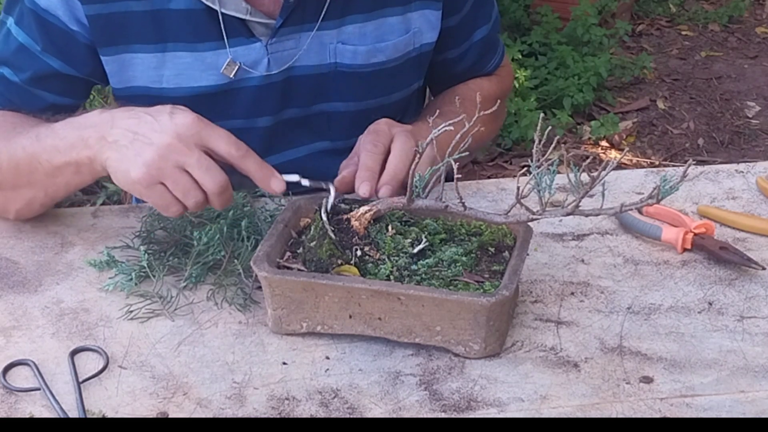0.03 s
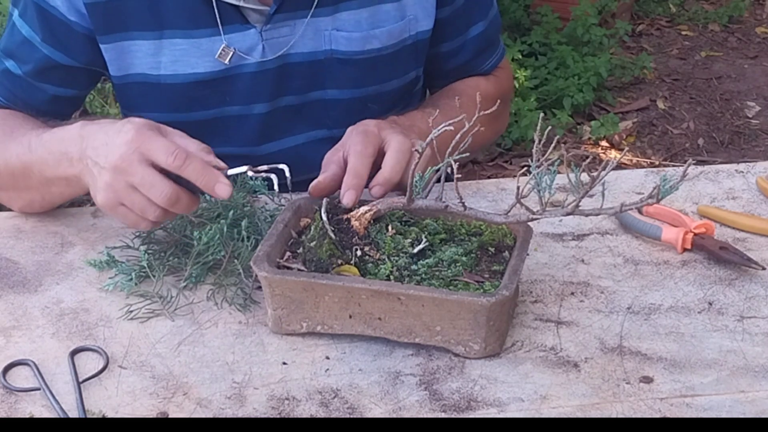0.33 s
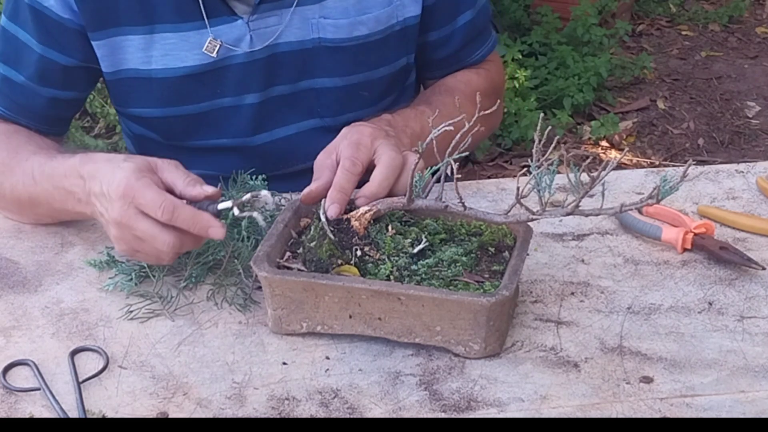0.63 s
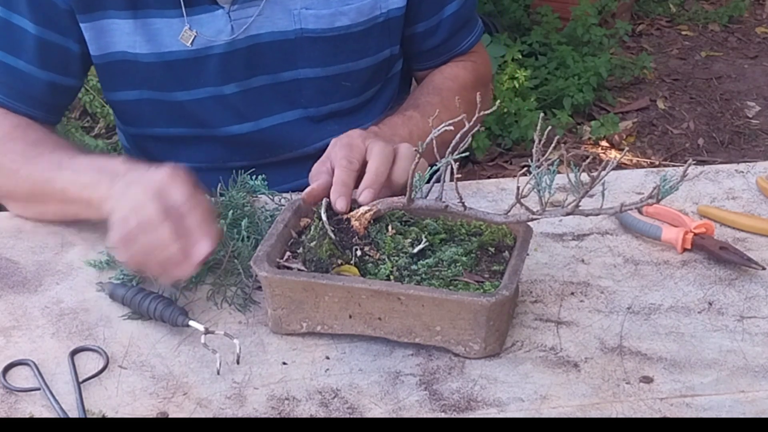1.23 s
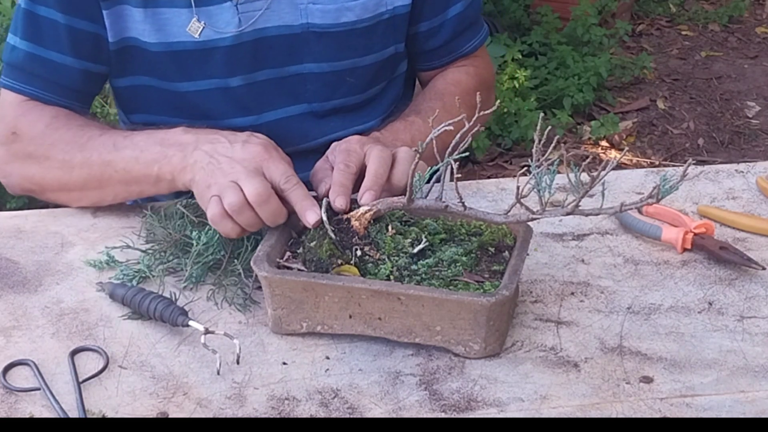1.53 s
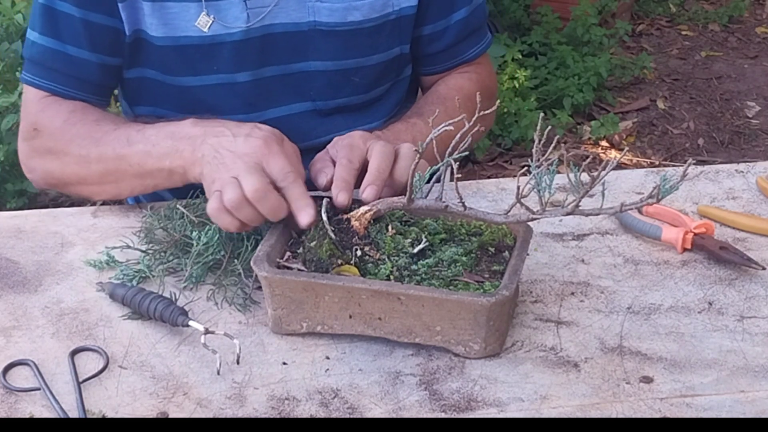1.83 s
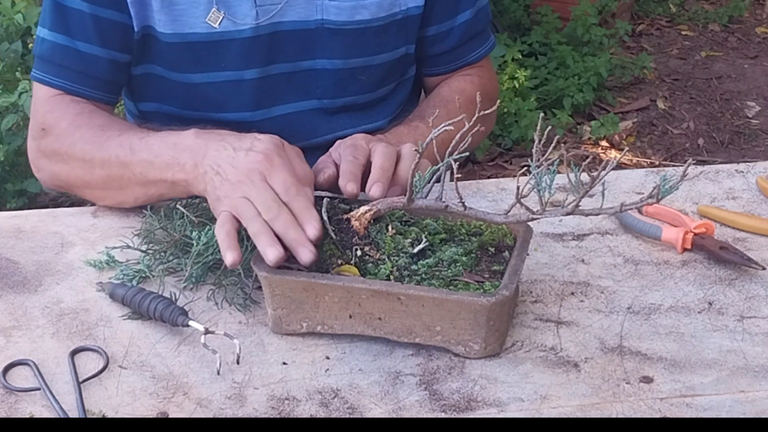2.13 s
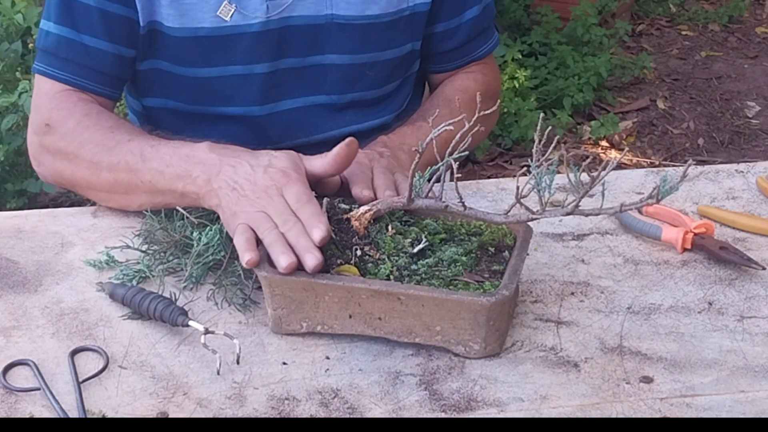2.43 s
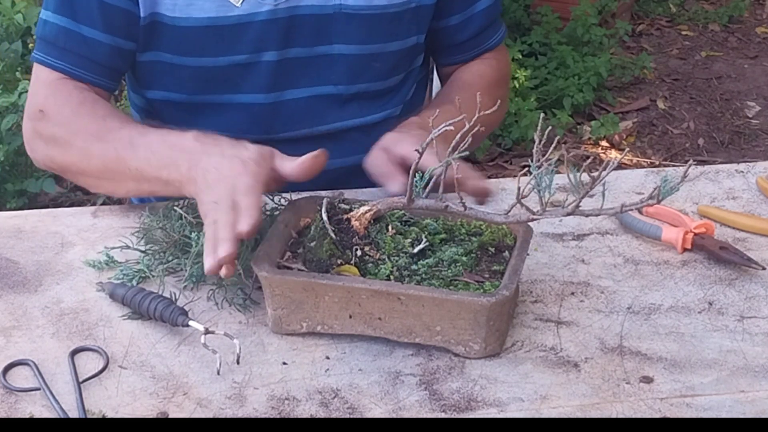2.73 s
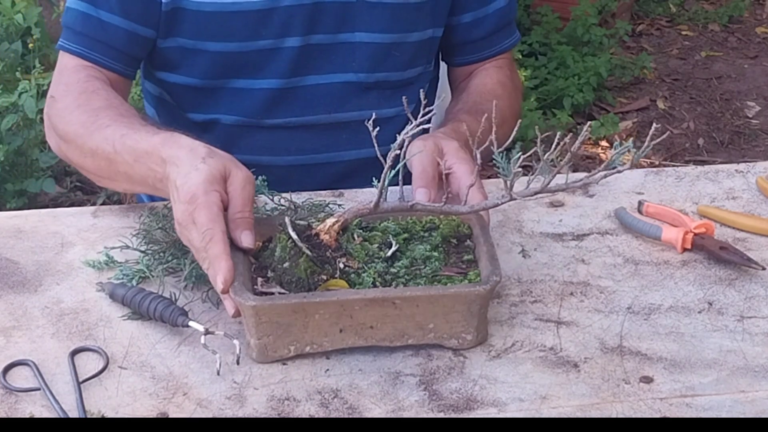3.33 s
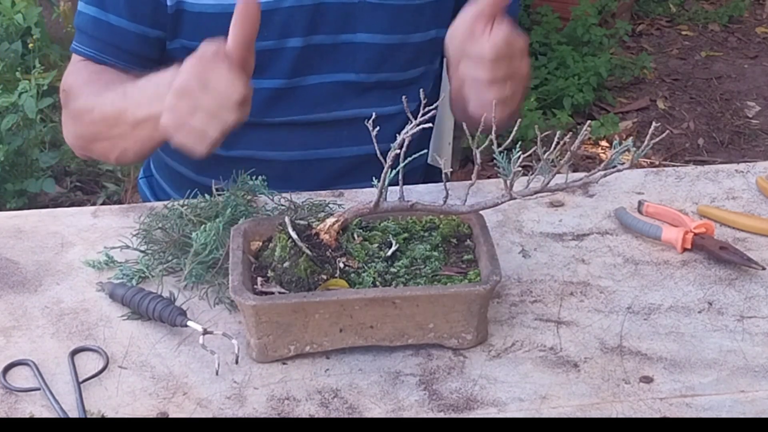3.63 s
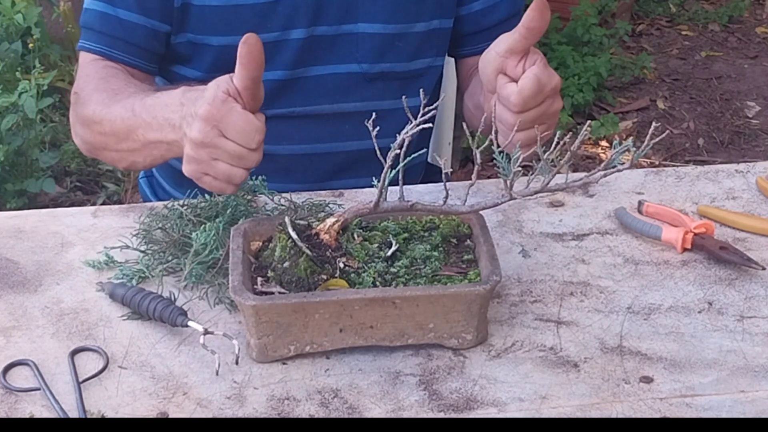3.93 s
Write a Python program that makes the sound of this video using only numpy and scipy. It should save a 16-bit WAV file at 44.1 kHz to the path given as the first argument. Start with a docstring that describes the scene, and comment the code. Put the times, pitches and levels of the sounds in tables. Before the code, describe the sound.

A ceramic pot scrapes briefly across a wooden table after a tool knocks down, birds chirping.

```python
"""Potting at a garden table

Close to the stereo microphones a small hand rake is put down on a wooden table with a knock.
Later a soil-filled ceramic pot is dragged round, catching and slipping on the gritty boards.
Clipped foliage rustles under the hands and light taps follow the drag. Farther off, birds keep
up falling chirps in the trees, over a low wavering hum and quiet outdoor air."""
import sys
import numpy as np
from scipy import signal
from scipy.fft import rfft, irfft
from scipy.io import wavfile
from scipy.ndimage import uniform_filter1d

SR = 44100
rng = np.random.default_rng(int(sys.argv[2]) if len(sys.argv) > 2 else 0)


def put_to_file(sound):
    """Save the sound as 16-bit audio at rate SR, in the file named by the first command-line argument."""
    columns = np.atleast_2d(sound).T  # one column per channel
    safe = np.clip(columns, -1, 1)
    whole_steps = np.round(safe * 32767)
    wavfile.write(sys.argv[1], SR, whole_steps.astype(np.int16))


N = 176400

# The unpitched part of a blow on the table. Each row: frequency in Hz, relative level in dB.
THUD_SPECTRUM = [(40,-32),(85,-35),(130,-0.5),(400,2),(1200,-4.5),(2000,-18),(4000,-31),(8000,-51)]
# How alike the two microphones hear blows and grit. Each row: frequency in Hz, likeness from -1 to 1.
CONTACT_LIKENESS = [(30,0.65),(110,1),(300,1),(1000,0.34),(2200,-0.41),(5000,0.25),(12000,-0.63)]
# The same for rustles and the surroundings.
AIR_LIKENESS = [(25,-0.68),(100,0.8),(200,0.8),(380,0.38),(800,-0.3),(2400,0.11),(12000,-0.15)]


def pot_drag():
    """Quick slips shake pot and table while grit cracks under the pot's foot."""
    # The course of the drag. Each row: time in seconds, relative judder and grit levels in dB.
    drag = [(2.97, -63, -66), (3.024, -49, -74), (3.034, -40.5, -61), (3.065, -24, -38),
            (3.172, -21.5, -39), (3.192, -11, -28), (3.204, -16.5, -39), (3.222, -12.5, -27.5),
            (3.24, -12.5, -36.5), (3.269, -13.5, -30), (3.3, -25.5, -44), (3.311, -55, -45),
            (3.324, -33, -63), (3.36, -68, -54)]
    # The foot catches on grains and slips. Each row: start in seconds, relative thud and crack in dB.
    slips = [(3.039,-41,-20),(3.063,3,-13),(3.069,-3.5,-8.5),(3.0924,-7,-7),(3.149,8.5,-16),(3.1574,2.5,-5),(3.176,3,-11),(3.191,1.5,-4),(3.211,-20,-27),(3.215,-11,3.5),(3.223,1.5,2),(3.2298,1,-3.5),(3.254,-17,-1.5),(3.267,0,-5),(3.277,1.5,-3.5),(3.2854,-26,-6),(3.309,-40,-4.5)]
    # The pot's ring on the boards. Each row: frequency in Hz, relative level in dB, T60 in seconds.
    pot_modes = [(130.7,-1,0.12),(168.9,-4.5,0.2),(199.8,-1.5,0.14),(224.7,-3.5,0.1),(347,-5.5,0.1),(393.5,-3.5,0.064),(482,-7,0.12),(624,-10.5,0.051),(842,-12.5,0.055),(907,-9.5,0.05),(1048,-12,0.078),(1145,-9.5,0.058),(1297,-13,0.027),(1530,-25,0.045),(1890,-26,0.2),(2200,-23.5,0.062),(2730,-29,0.22)]
    # Crushed grit. Each row: frequency in Hz, relative level in dB.
    grit_spectrum = [(200,-27),(1200,9),(2500,2),(4000,0.5),(6800,2),(8500,-7.5),(11000,-0.5),(16000,-6.5)]
    t = np.arange(N) / SR
    times, judder_db, grit_db = np.transpose(drag)
    force = grains(per_s=1500, spread_db=0.77) * amp(np.interp(t, times, judder_db, -120, -120) - 2)
    grit = crackle(grit_spectrum, CONTACT_LIKENESS, per_s=8200, spread_db=5)
    grit *= amp(np.interp(t, times, grit_db, -120, -120) - 1.5)
    for start, thud_db, crack_db in slips:
        add(force, start, amp(thud_db + 7) * blow(contact_s=0.0028))
        add(grit, start, amp(crack_db - 2.5) * burst(grit_spectrum, t60=0.016))
    ringing = convolve(force, ring(pot_modes, skew_per_hz=0.0001, sign=-1))
    thuds = amp(-4.5) * convolve(force, burst(THUD_SPECTRUM, t60=0.023))
    return pan(grit + board_radiation(ringing + thuds), left_db=-0.5)


def rake():
    """The tines ping; then the tool clicks on the wood and its soft handle bounces with a dull clunk."""
    # The rake lands and settles.
    # Each row: start in seconds, relative thud and click in dB, contact time in seconds.
    knocks = [(1.2255,-1.5,2.5,0.0002),(1.228,-7,-13,0.0014),(1.2306,0,-6.5,0.0014),(1.2591,-11,-19,.001),(1.265,-8.5,-32,0.0037),(1.284,-13,-40,0.0025),(1.308,-17.5,-27,0.00031)]
    # The tabletop's ring. Each row: frequency in Hz, relative level in dB, T60 in seconds.
    board_modes = [(141,-9,0.11),(164,7.5,0.084),(225,6,0.076),(290,0,0.022),(361,9.5,0.039),(545,-3,0.031),(663,-5,0.1),(864,-16,0.097),(1043,-13,0.05),(1137,-2,0.084),(1530,0.5,0.072),(2400,-9,.035)]
    # The click on the wood. Each row: frequency in Hz, relative level in dB.
    click_spectrum = [(100,7.5),(500,11),(1500,2),(2600,-1.5),(4200,1),(7500,-16),(9000,-27),(16000,-31)]
    # The tines as the rake is lifted out. Each row: start in seconds, level in dB.
    pings = [(.137,-56),(.25,-45.5),(.273,-45)]
    tine_hz, tine_t60 = 2140, 0.091
    out, t = np.zeros((2, N)), np.arange(SR // 3) / SR
    board = ring(board_modes, skew_per_hz=0.0002, sign=1)
    add(board, 0, amp(-7.5) * burst(THUD_SPECTRUM, t60=0.15))
    for start, thud_db, click_db, contact_s in knocks:
        add(out, start, amp(thud_db + 11.5) * convolve(blow(contact_s), board_radiation(board)))
        add(out, start, amp(click_db + 2) * burst(click_spectrum, t60=0.04))
    for start, db in pings:
        add(out, start, amp(db - 60 * t / tine_t60) * np.sin(2 * np.pi * tine_hz * t))
    return pan(out, left_db=-1.0)


def blow(contact_s):
    """The force of one blow: the longer the contact, the duller."""
    pulse = np.hanning(max(round(contact_s * SR), 1) + 2)
    return pulse / pulse.sum()


def ring(modes, skew_per_hz, sign):
    """Dying modes; sign 1 starts them all together, -1 alternates them so that the ring builds."""
    t = np.arange(SR // 3) / SR
    out = np.zeros((2, len(t)))
    for k, (hz, db, t60) in enumerate(modes):
        skew = np.array([[1], [-1]]) * min(hz * skew_per_hz, 1)  # microphones more out of step when high
        out += sign ** k * amp(db - 60 * t / t60) * np.sin(2 * np.pi * hz * t + skew)
    return unit_energy(out)


def board_radiation(x):
    """The boards radiate neither deep bass nor high treble."""
    return signal.sosfilt(signal.butter(4, [98, 3760], "band", fs=SR, output="sos"), x)


def handling():
    """Foliage crackles, hands shuffle, and fingers and twigs tap dully on the pot."""
    # Rustles and shuffles. Each row: peak time in seconds, half length in seconds, level in dB.
    rustles = [(0.142,0.028,-58),(.29,0.1,-52),(0.558,0.052,-58),(0.672,0.047,-52),(1.52,0.055,-57),(1.83,0.055,-60),(2.419,0.27,-63),(2.936,0.035,-58),(3.484,0.034,-61),(3.64,0.18,-61.5)]
    shuffles = [(0.09,0.029,-53.5),(0.38,0.041,-47),(0.705,0.031,-51.5),(1.054,0.13,-47.5),(1.315,0.11,-42.5),(1.928,0.078,-50),(2.506,0.039,-48.5),(2.66,0.068,-49.5),(2.808,0.037,-47),(2.976,0.068,-48),(3.418,0.034,-50),(3.73,0.23,-51.5)]
    # Light taps. Each row: start in seconds, relative level in dB.
    taps = [(.25,-29.5),(0.362,-22.5),(.375,-23),(0.386,-21.5),(0.396,-21.5),(0.723,-24),(1.48,-15.5),(3.545,-21.5),(3.63,-8),(3.683,-9.5),(3.725,-11.5),(3.757,-11),(3.799,-13.5),(3.824,-16.5),(3.879,-20.5),(3.912,-17)]
    # The colour of leaves, hands and taps. Each row: frequency in Hz, relative level in dB.
    leaf_spectrum = [(200,-64),(1000,-3),(2200,1.5),(6500,3.5),(8500,-5.5),(12000,2.5),(16000,-2.5)]
    hand_spectrum = [(70,-30),(140,-15.5),(220,7.5),(330,-7.5),(620,5.5),(1000,-8),(2000,-19),(8000,-34.5)]
    tap_spectrum = [(60,-2),(150,14),(400,9.5),(1200,0),(2200,-6.5),(4000,-12.5),(8000,-36),(16000,-61)]
    leaves = crackle(leaf_spectrum, AIR_LIKENESS, per_s=6000, spread_db=2.2)
    leaves *= sum(swell(*row) for row in rustles)
    hands = crackle(hand_spectrum, AIR_LIKENESS, per_s=1200, spread_db=1.0)
    hands *= sum(swell(*row) for row in shuffles)
    out = pan(leaves + hands, left_db=-5.5)
    for start, db in taps:
        add(out, start, amp(db) * burst(tap_spectrum, t60=0.14))
    return out


def birds():
    """Calls from the trees to the right; the fainter a chirp, the farther off and the more smeared."""
    # Falling chirps. Each row: time of the bend in seconds, pitch there in Hz, slide length in seconds,
    # relative level in dB, the lead's height as a share of the pitch, its level against the slide in dB.
    chirps = [(.049,3973,0.04,-39.5,0.25,-6),(0.313,3740,0.035,-40.5,0.25,-7.5),(0.538,3407,0.089,-49,0.23,-15),(0.569,4660,0.032,-52,0.021,-5),(0.608,3930,0.039,-42.5,0.1,-9.5),(0.806,3627,0.082,-44,0.32,-16.5),(0.889,3654,0.084,-45.5,0.23,-10),(1.177,3750,0.088,-46.5,0.094,-13.5),(1.356,3730,0.081,-43,0.31,-14.5),(1.821,3820,0.026,-44.5,0.077,-12.5),(1.848,3010,0.1,-54,0.0062,-3),(1.863,3626,0.08,-41,0.29,-12.5),(2.064,2797,0.077,-51.5,0.065,-34),(2.124,3825,0.05,-48,0.14,-8.5),(2.321,4170,0.037,-52,0.084,-13),(2.409,3700,0.032,-46.5,0.0096,-15),(2.493,3720,0.074,-42,0.28,-14),(2.831,4270,0.078,-51,0,-9),(2.943,2910,0.048,-53,0.03,-3),(3.148,3790,0.099,-41,0.16,-9),(3.364,4140,0.088,-49.5,0.047,-3.5),(3.46,3707,0.037,-49.5,0.044,-24),(3.754,3797,0.08,-41,0.22,-14)]
    # One piercing peep and a far rising whistle.
    # Each row: time in seconds, pitch in Hz, relative level in dB.
    peep = [(1.475,8300,-61),(1.503,7900,-52),(1.519,6820,-42.5),(1.55,6300,-44),(1.582,6030,-61)]
    whistle = [(1.55,1558,-46.5),(1.63,1658,-60.5),(1.72,1729,-55),(1.87,1803,-56.5),(1.93,1940,-52),(1.95,1720,-62)]
    # A far bird's low notes.
    # Each row: peak time and half length in seconds, pitch in Hz, relative level in dB.
    coos = [(1.154,.04,795,-43),(1.838,0.023,1000,-51),(2.2,0.011,1606,-48.5)]
    near_db, far_db, scatter_t60 = -42, -50, 0.07
    t = np.arange(N) / SR
    direct = thin_note(peep, octave_db=-40)
    for peak, half, hz, db in coos:
        direct += swell(peak, half, db) * np.sin(2 * np.pi * hz * t)
    far = thin_note(whistle, octave_db=-3)
    for bend, hz, length, db, rise, lead_db in chirps:
        offset, call = chirp(hz, length, db, rise, lead_db)
        nearness = np.clip((db - far_db) / (near_db - far_db), 0, 1)
        add(direct, bend + offset, np.sqrt(nearness) * call)
        add(far, bend + offset, np.sqrt(1 - nearness) * call)
    leaf_scatter = unit_energy(rng.standard_normal((2, N)) * amp(-60 * t / scatter_t60))
    calls = direct + convolve(far, leaf_scatter) + amp(-1) * garden_echo(direct + far)
    return amp(-2.5) * pan(calls, left_db=-5.0)


def chirp(bend_hz, length, db, rise, lead_db):
    """A soft high lead bends into a loud falling slide. Returns its start from the bend, and the call."""
    lead_s, release_s, arch_s = 0.075, 0.01398, 0.03
    t = np.arange(-lead_s, length + release_s, 1 / SR)
    in_lead = 0.5 - 0.5 * np.tanh((t + 0.011) / 0.006)  # 1 before the bend, 0 after
    lead_fall = 1.8 * arch_s * np.tanh(np.minimum(t, 0) / arch_s)
    slide_fall = 0.11 * np.maximum(t, 0) / length
    last_flick = 0.08 * np.logaddexp(0, (t - length) / release_s + 1)
    warble = 1 + 0.018 * drift(len(t), 127)
    hz = bend_hz * (1 + rise * in_lead) * np.exp(-lead_fall - slide_fall - last_flick) * warble
    phase = 2 * np.pi * np.cumsum(hz) / SR
    attack = np.clip((t + lead_s) / 0.009, 0, 1)
    release = np.clip((length + release_s - t) / release_s / 2, 0, 1)
    rough_tone = np.sin(phase) * (1 + amp(-6.5) * drift(len(t), 830))
    octave = amp(-22) * (1 - in_lead) ** 6 * drift(len(t), 280) * np.sin(2 * phase)
    return -lead_s, amp(db + lead_db * in_lead) * attack * release * (rough_tone + octave)


def thin_note(curve, octave_db):
    """A bird's gliding, slightly unsteady note and its octave."""
    t = np.arange(N) / SR
    times, hz, db = np.transpose(curve)
    pitch = np.interp(t, times, hz) * (1 + 0.012 * drift(N, 90))
    phase = 2 * np.pi * np.cumsum(pitch) / SR
    level = amp(np.interp(t, times, db, -140, -140))
    return level * (np.sin(phase) + amp(octave_db) * np.sin(2 * phase))


def rasps():
    """Brief swells of narrow, scratchy hiss from the garden."""
    # Each row: peak time and half length in seconds, centre in Hz, relative width, level in dB.
    hisses = [(0.947,0.014,1260,0.38,-42),(1.027,0.049,1630,0.41,-46.5),(1.132,0.044,1670,0.38,-46.5),(1.302,0.052,2460,0.13,-47),(1.92,0.14,1630,0.83,-53),(2.192,0.043,5530,.25,-48),(2.255,0.044,1800,0.23,-52.5),(2.402,0.064,5440,0.23,-51),(2.855,0.067,770,0.17,-46.5)]
    hz, out = np.geomspace(100, 16000, 200), np.zeros((2, N))
    for peak, half, centre, width, db in hisses:
        band_db = -20 * np.log10(1 + (np.log2(hz / centre) / width / 1.5) ** 4)
        out += swell(peak, half, db) * noise(np.c_[hz, band_db])
    return pan(out, left_db=-1.5)


def garden_echo(x):
    """Diffuse echo from trees and walls."""
    # The echo's decay. Each row: frequency in Hz, T60 in seconds.
    decay_times = [(100,0.53),(1000,0.49),(3500,0.43),(8000,0.29),(16000,0.37)]
    hz, t, bands = signal.stft(rng.standard_normal((2, SR)), SR, nperseg=256)
    envelope = amp(-60 * t / at_hz(decay_times, hz)[:, None]) * np.minimum(t / 0.0017, 1)
    tail = signal.istft(bands * envelope, SR, nperseg=256)[1]
    return convolve(x, unit_energy(tail))


def air():
    """Quiet outdoor air, its level flickering in small patches of time and frequency."""
    # The air's colour before the bass cut. Each row: frequency in Hz, relative level in dB.
    air_spectrum = [(100,22.5),(170,0),(300,-6),(450,-13.5),(700,-11.5),(1000,-20),(2100,-25.5),(3400,-13.5),(4800,-27),(6900,-29.5),(8200,-44.5),(11000,-29.5),(16000,-39)]
    hz, _, bands = signal.stft(noise(air_spectrum), SR, nperseg=1024)
    patches = uniform_filter1d(rng.standard_normal(bands.shape[1:]), size=14, axis=0)
    patch_db = 2.2 * unit_rms(uniform_filter1d(patches, size=8, axis=1))
    bass_cut = 1 / (1 + (125.7 / (hz[:, None] + 1)) ** 8)
    hiss = signal.istft(bands * amp(patch_db) * bass_cut, SR, nperseg=1024)[1][:, :N]
    return pan(amp(-48.5) * unit_rms(hiss), left_db=-3.5)


def hum():
    """A low tone wavers in level and phase inside a narrow blur of noise."""
    # The tone's swells and dips. Each row: time in seconds, relative level in dB.
    levels = [(0.0, -38), (0.45, -39), (0.49, -47), (0.6, -36), (0.81, -42), (0.95, -35.5), (1.07, -43),
              (1.17, -39), (1.59, -40), (1.69, -47), (1.78, -37.5), (2.21, -40.5), (2.25, -51), (2.42, -38),
              (2.8, -36.5), (2.95, -48)]
    hum_hz, blur_hz = 98.7, 12
    t = np.arange(N) / SR
    phase = 2 * np.pi * hum_hz * t
    level = amp(np.interp(t, *np.transpose(levels), right=-40) - 1.5)
    tone = level * np.sqrt(2) * np.sin(phase + 0.27 * drift(N, 4.3))
    blur = drift(N, blur_hz) * np.sin(phase) + drift(N, blur_hz) * np.cos(phase)
    return tone + amp(-49) * blur


def rumble():
    """Steady low noise under the whole garden."""
    # Each row: frequency in Hz, relative level in dB.
    rumble_spectrum = [(15,-29),(35,-32),(52,9),(70,6.5),(110,5),(300,-23),(1000,-70)]
    return amp(-50.5) * noise(rumble_spectrum)


def amp(db):
    """Decibels to gain."""
    return 10 ** (np.asarray(db) / 20)


def unit_rms(x):
    """Scales to rms 1."""
    return x / np.sqrt(np.mean(x ** 2) + 1e-20)


def unit_energy(x):
    """Scales to a mean energy of 1 per channel."""
    return unit_rms(x) / np.sqrt(x.shape[-1])


def at_hz(points, hz):
    """Reads a table on a log-frequency axis."""
    f, value = np.transpose(points)
    return np.interp(np.log(hz + 1), np.log(f + 1), value)


def add(mix, start, sound):
    """Mixes a sound in at a start time in seconds."""
    at = round(start * SR)
    sound = sound[..., max(-at, 0):]
    part = mix[..., max(at, 0):][..., :sound.shape[-1]]
    part += sound[..., :part.shape[-1]]


def swell(peak, half, db):
    """A smooth rise and fall around the peak time."""
    return amp(db) * np.exp(-((np.arange(N) / SR - peak) / half) ** 2)


def drift(count, hz):
    """Random wandering up to about hz, rms near 1."""
    lowpass = np.exp(-(np.fft.rfftfreq(N, 1 / SR) / hz) ** 2)
    return unit_rms(irfft(rfft(rng.standard_normal(N)) * lowpass, N))[:count]


def colour(pair, spectrum, likeness):
    """Gives two unrelated signals a spectrum and the likeness of the two microphones."""
    hz = np.fft.rfftfreq(pair.shape[1], 1 / SR)
    a, b = rfft(pair) * amp(at_hz(spectrum, hz))
    same = np.clip(at_hz(likeness, hz), -1, 1)
    mid, side = a * np.sqrt(1 + same), b * np.sqrt(1 - same)
    return unit_rms(irfft(np.array([mid + side, mid - side]), pair.shape[1]))


def noise(spectrum):
    """Coloured stereo noise."""
    return colour(rng.standard_normal((2, N)), spectrum, AIR_LIKENESS)


def burst(spectrum, t60):
    """A sharp, dying puff of noise."""
    t = np.arange(6000) / SR
    puff = colour(rng.standard_normal((2, len(t))), spectrum, CONTACT_LIKENESS)
    return unit_energy(puff * amp(-60 * t / t60))


def grains(per_s, spread_db):
    """Random clicks of uneven size."""
    clicks = (rng.random(N) < per_s / SR) * rng.choice([-1, 1], N)
    return unit_rms(clicks * amp(spread_db * np.minimum(rng.exponential(1, N), 4)))


def crackle(spectrum, likeness, per_s, spread_db):
    """Dense, coloured clicks in stereo."""
    return colour(np.array([grains(per_s, spread_db) for _ in range(2)]), spectrum, likeness)


def convolve(x, response):
    """Plays x through a stereo response."""
    return signal.fftconvolve(np.atleast_2d(x), response, axes=1)[:, :N]


def pan(x, left_db):
    """Leans a sound to the left, or to the right when left_db is negative."""
    return x * amp([[left_db / 2], [-left_db / 2]])


def scene():
    """The table close to the microphones, the garden around it."""
    table = pot_drag() + rake() + handling()
    return table + amp(-20.5) * garden_echo(table) + birds() + rasps() + air() + hum() + rumble()


def record(dry):
    """The recorder's band limit."""
    lowpass = signal.firwin(511, 15950, window=("kaiser", 9), fs=SR)
    return signal.oaconvolve(dry, lowpass[None], "same")


dry = scene()
out = record(dry)
put_to_file(out)
```